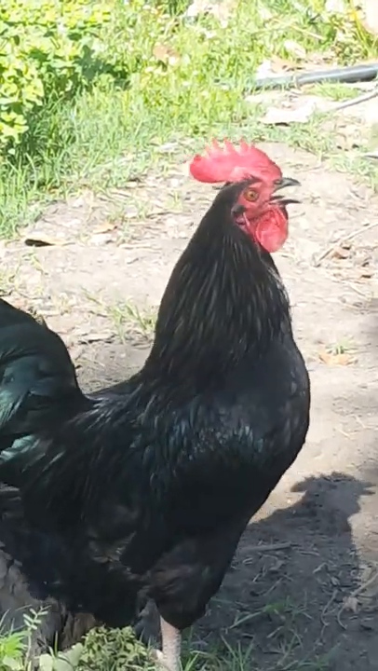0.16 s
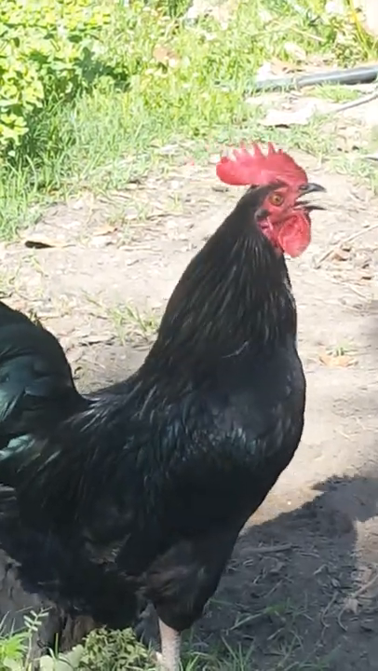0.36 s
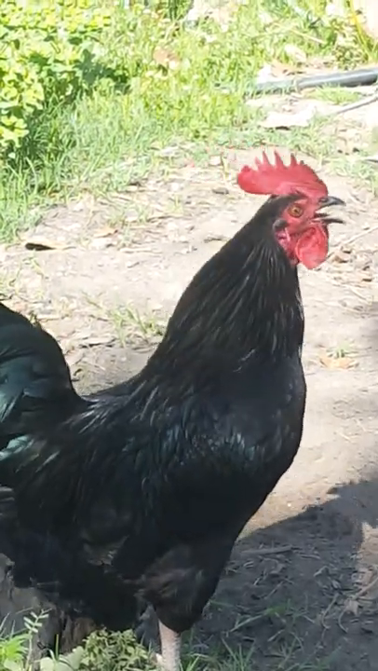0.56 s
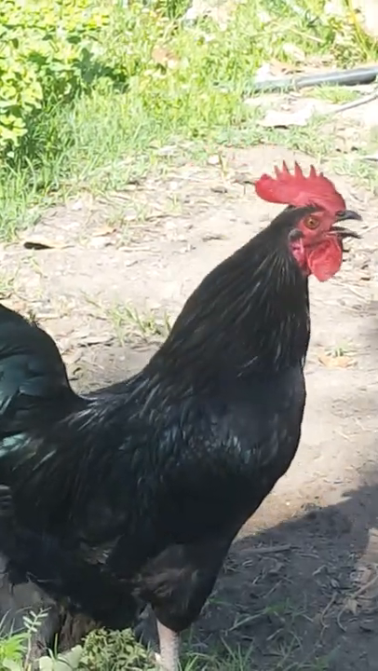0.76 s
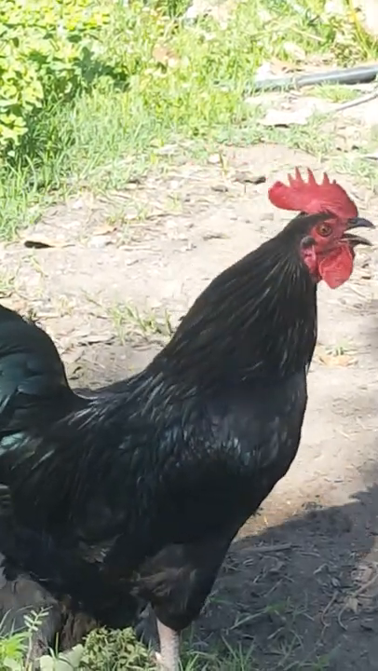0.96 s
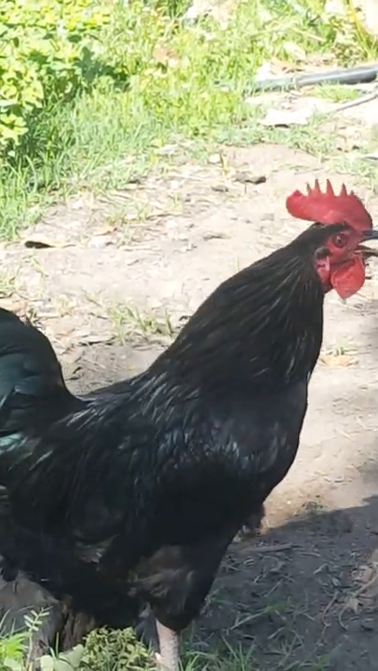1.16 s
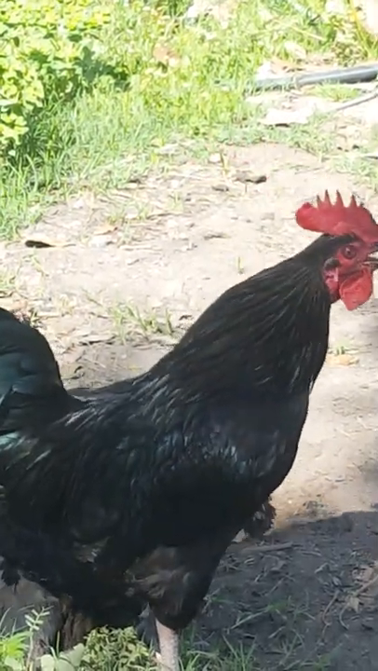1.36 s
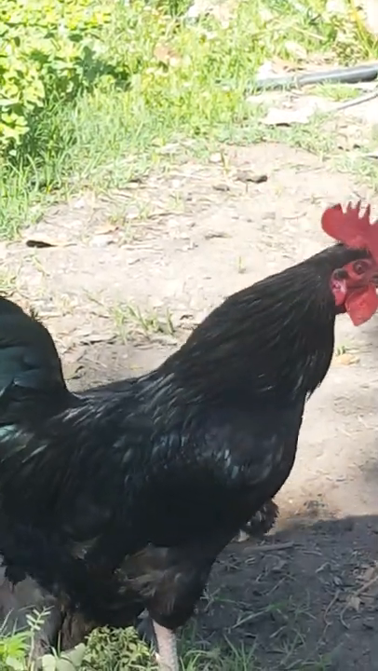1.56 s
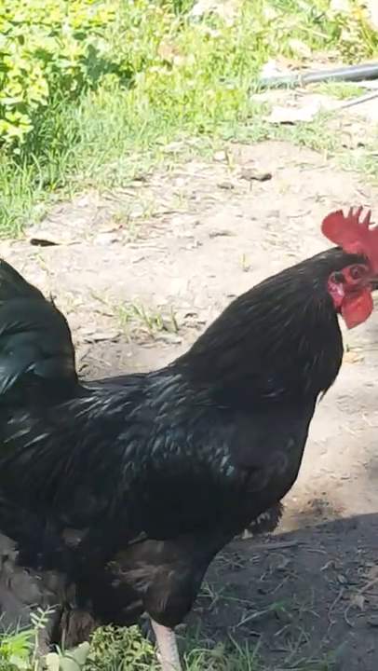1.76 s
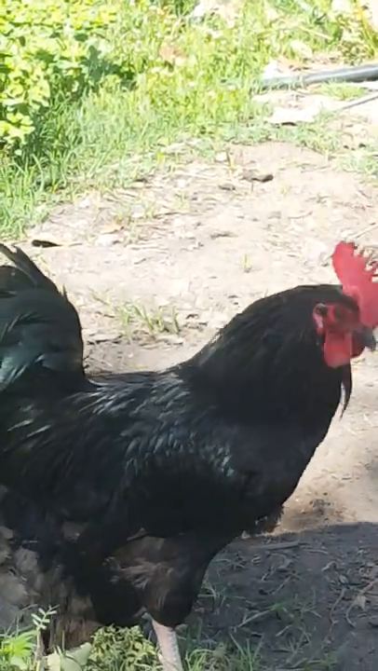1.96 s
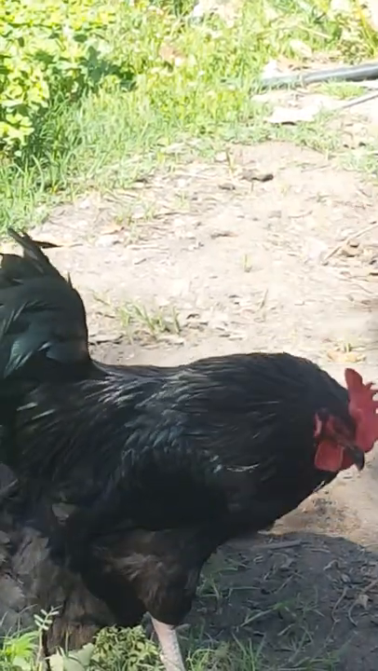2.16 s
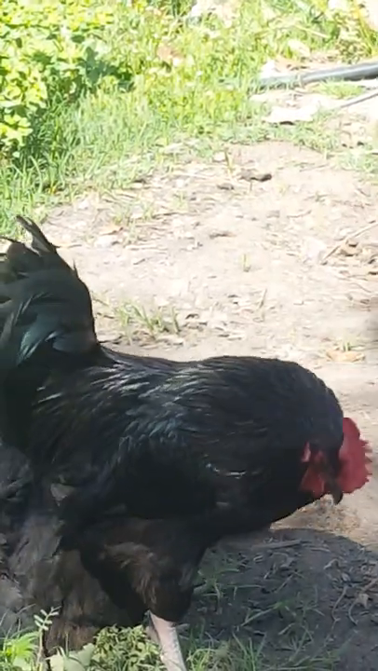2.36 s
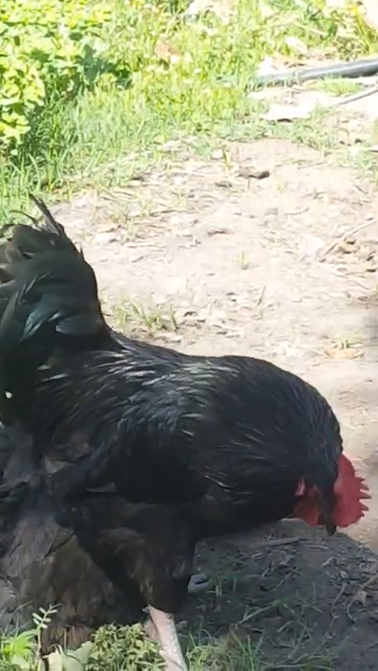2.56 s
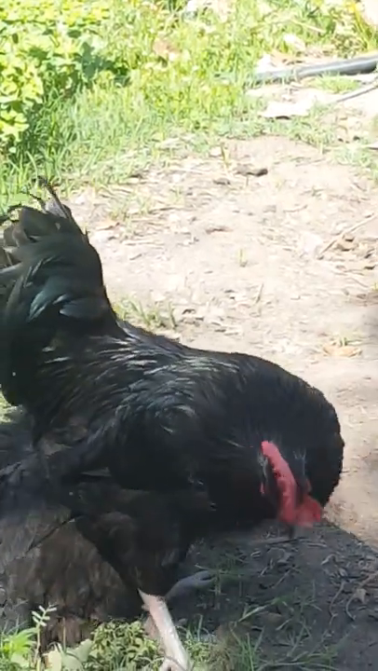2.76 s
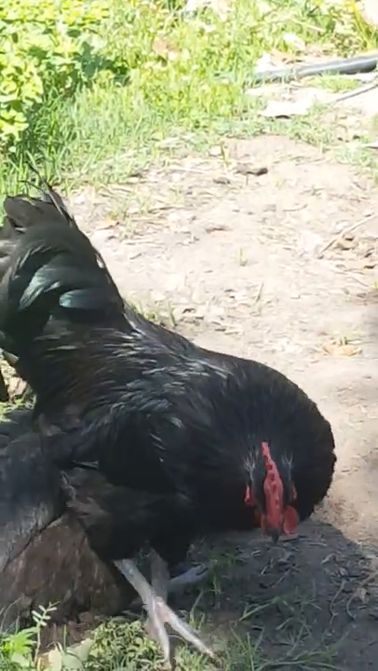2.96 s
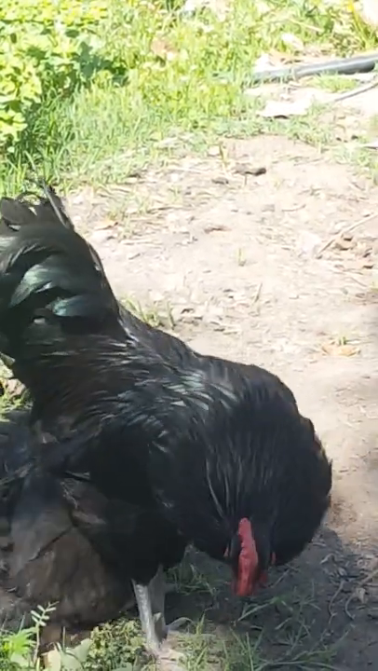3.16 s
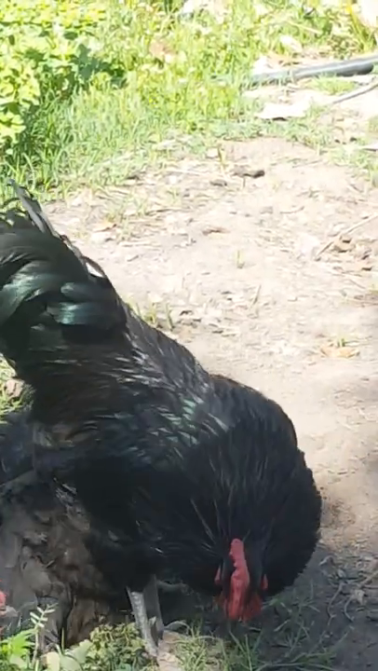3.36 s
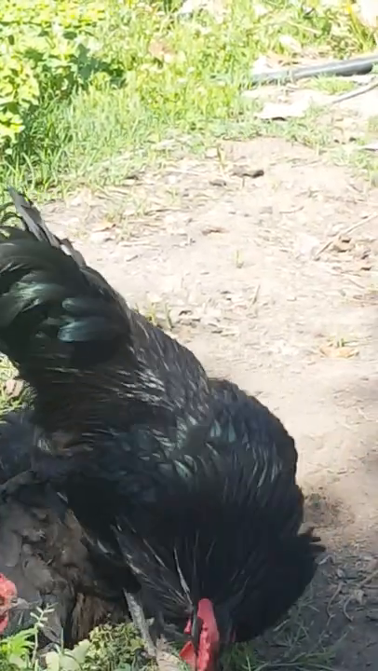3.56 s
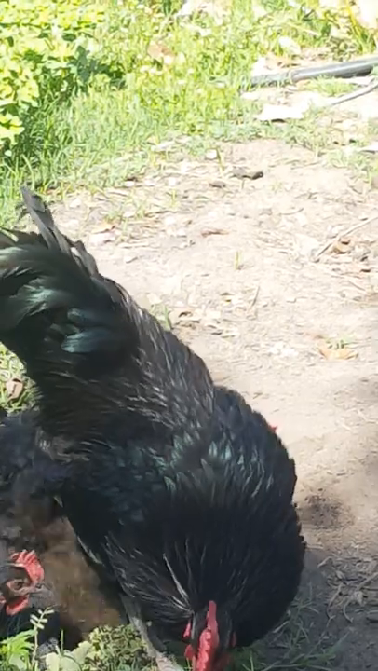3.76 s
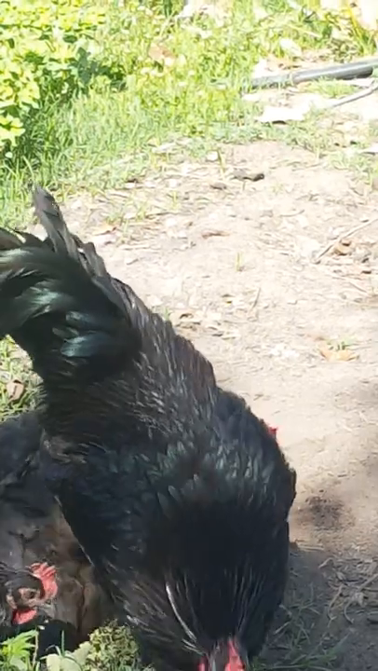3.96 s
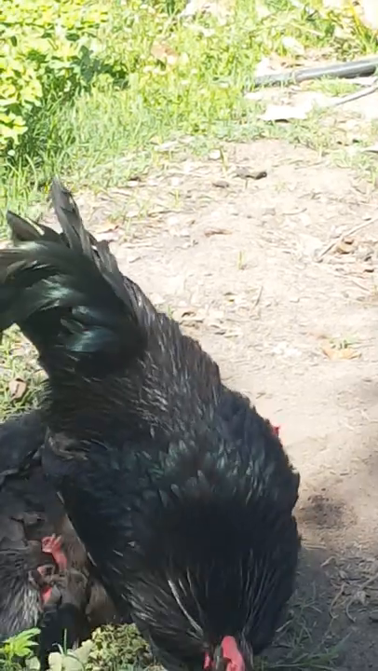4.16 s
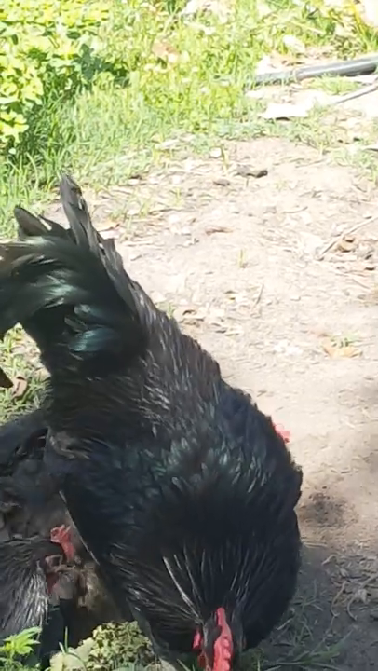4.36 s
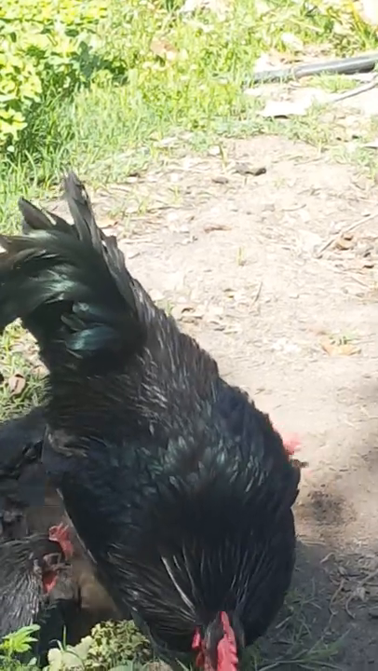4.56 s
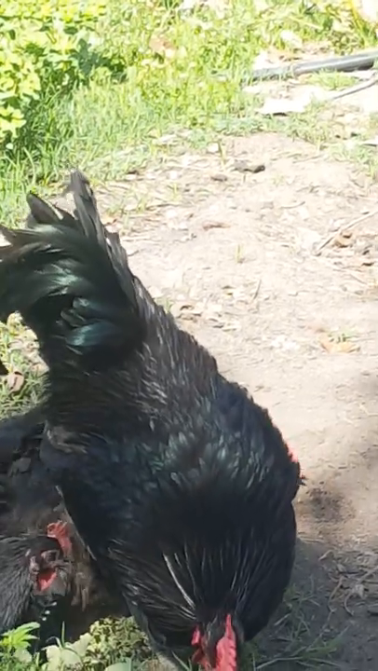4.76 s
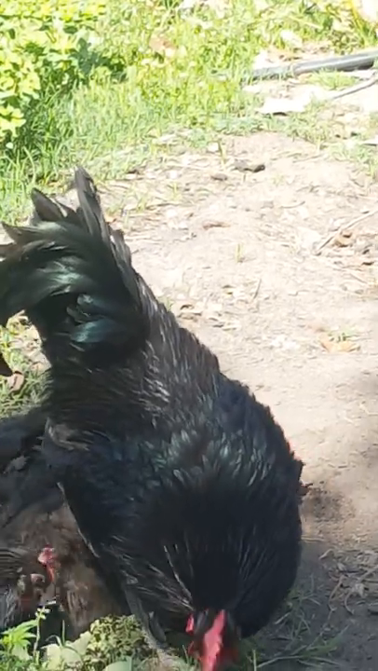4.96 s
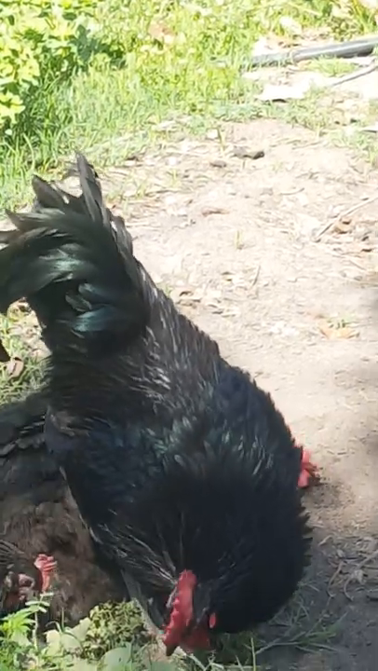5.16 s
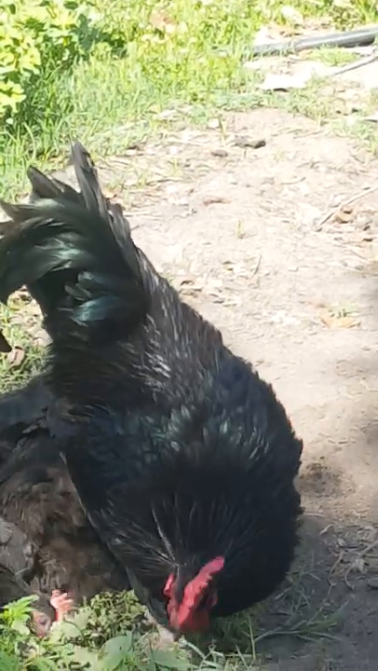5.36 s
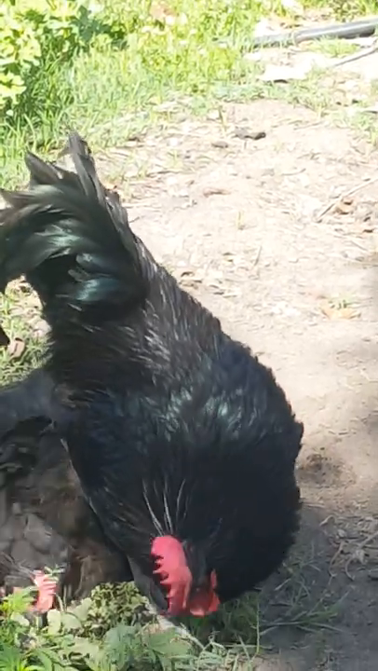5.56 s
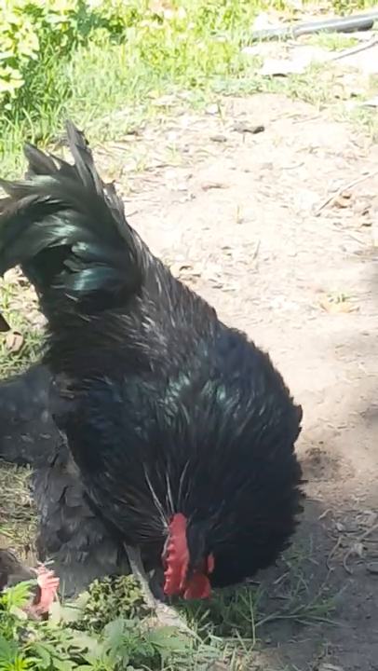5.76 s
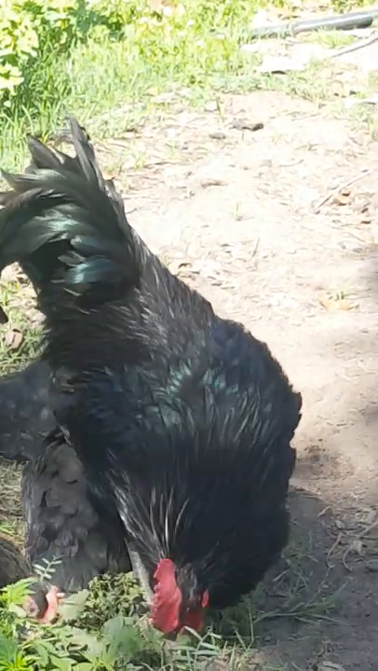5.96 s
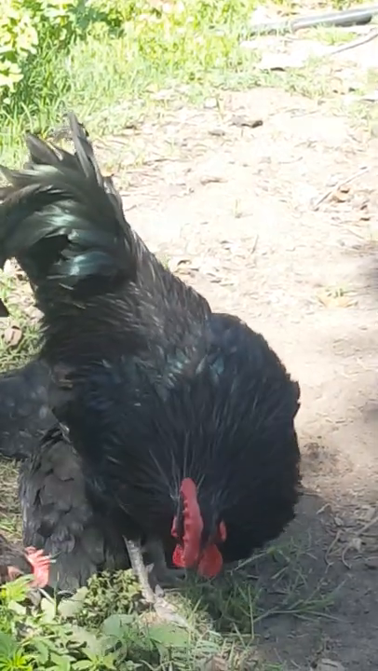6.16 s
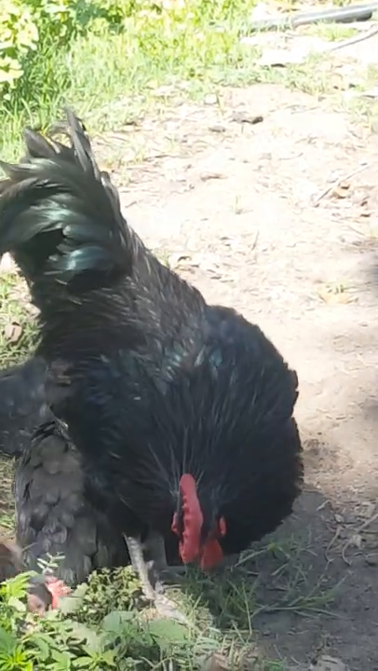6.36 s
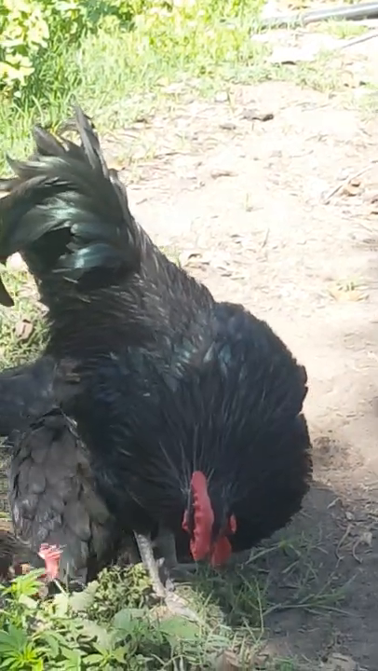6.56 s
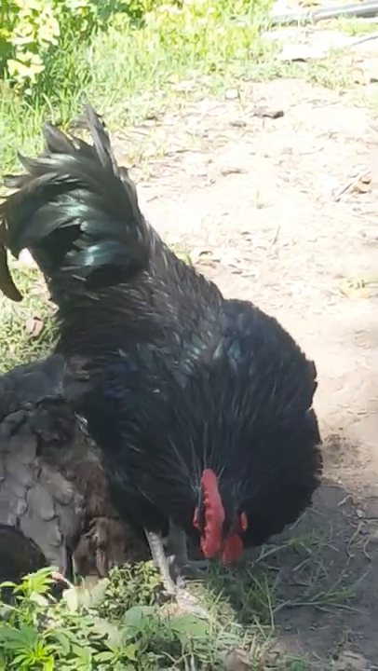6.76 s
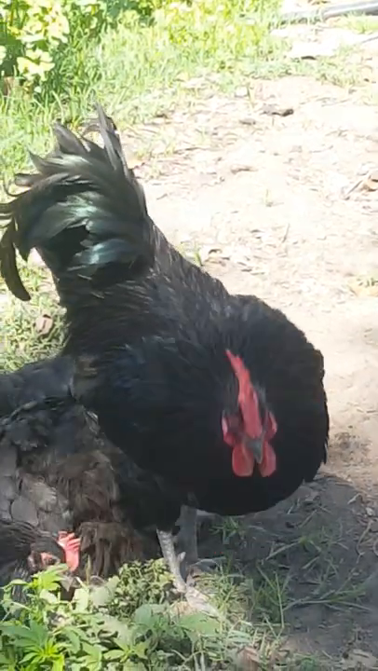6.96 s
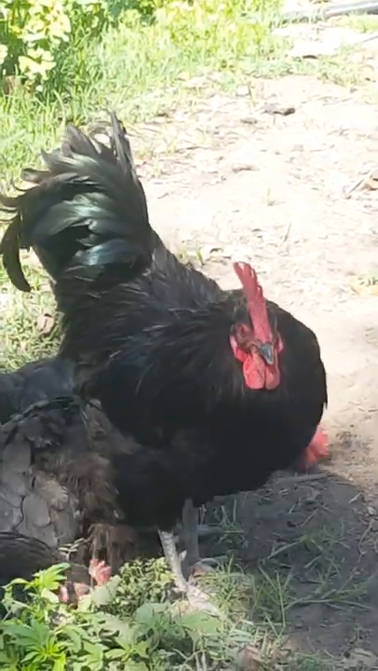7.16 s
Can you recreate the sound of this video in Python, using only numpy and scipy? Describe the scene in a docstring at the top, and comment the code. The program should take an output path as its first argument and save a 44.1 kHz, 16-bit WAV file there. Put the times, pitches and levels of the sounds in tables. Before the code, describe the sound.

A rooster close by finishes one loud, raspy crow with a long sinking note, then small birds chirp faintly over low outdoor rumble.

```python
"""A backyard: a rooster crows once, close by, with a cracked opening, a dip, then a long sinking note.
The crow is a stack of harmonics coloured by the throat, with a half-pitch undertone and pulsed noise for rasp.
Small birds farther off are near-pure notes on gliding pitches, blurred by the yard's scattered echo.
Short noise bursts tick on the ground; shaped noise makes the low outdoor rumble, under a wavering hum."""
import sys
import numpy as np
from scipy import signal
from scipy.fft import rfft, irfft
from scipy.io import wavfile
from scipy.ndimage import uniform_filter1d

SR = 44100
rng = np.random.default_rng(int(sys.argv[2]) if len(sys.argv) > 2 else 0)


def store_wav(level_fs):
    """Save 16-bit WAV to argv[1]."""
    pcm = np.round(np.clip(np.atleast_2d(level_fs), -1, 1) * 32767)
    wavfile.write(sys.argv[1], SR, pcm.T.astype(np.int16))


N = 321930  # length in samples

# The syrinx's pitch. Each row: time in seconds, pitch in Hz before the final drop.
CROW_PITCH = [(0.0, 827.4), (0.05, 816.4), (0.072, 690.6), (0.09, 662.4), (0.12, 692), (0.142, 594),
              (0.214, 540.5), (0.24, 554.7), (0.28, 623.4), (0.306, 648.6), (0.354, 664), (0.414, 658.3),
              (0.508, 679.2), (0.764, 672.9), (0.802, 655), (1.014, 644.4), (1.302, 610), (1.55, 539)]
# How the crow is pushed and shaped. Each row: time in seconds, effort in dB, overtones in dB, gape from 0 to 1.
CROW_SHAPE = [(0.0, 2.4, 1.9, 0.86), (0.05, 1.7, -2.2, 0.83), (0.07, -1, 1.5, 0.17), (0.13, -2, 3.0, 0.32),
              (0.17, 0.7, 4, 0.29), (0.21, -8.5, 7, 0.4), (0.26, 0.2, 4.5, 0.57), (0.33, 1.5, -3, 0.0),
              (0.48, 1.9, -3, 0.04), (0.51, 1.8, -4.5, 0.0), (0.75, 1.25, -4, 0.3), (0.8, 1.17, -1.4, 0.58),
              (1.3, 2.5, -1.6, 1.0), (1.5, -1, -0.3, 0.99), (1.57, 1.9, -1.2, 0.63)]
# Resonances of windpipe and beak; the harmonics slide through them.
# Each row: centre in Hz, width in Hz, gain in dB at gape 0, gain in dB at gape 1.
TRACT_RESONANCES = [(685.4, 84, -10.5, -6), (769.0, 114, -19, -10.0), (1241, 260, -13.0, -24.5),
                    (1586, 163, -36, -6.5), (2050, 300, -36.5, -18.5), (2287, 152, -22.5, -18.5),
                    (2563, 229.0, -30, -23.0), (3487, 1100, -30.5, -37)]
# Colour of the higher harmonics. Each row: frequency in Hz, relative level in dB.
TREBLE_COLOUR = [(3300, 3), (4000, -1), (4700, -4), (5500, -5.5), (6100, -1), (6700, 5.5), (7300, -7.5),
                 (7900, -3), (8600, -3.5), (9300, -24), (9900, -14.5), (10400, -21), (11200, -9),
                 (12300, -18.5), (13300, -5.5), (15500, -19.5)]
# Level of the higher harmonics together. Each row: time in seconds, level in dB before the trim.
TREBLE_LEVEL = [(0.0, -35), (0.098, -45.5), (0.258, -37), (0.366, -52.5), (1.294, -40), (1.532, -44.5),
                (1.55, -40.5)]
TREBLE_TRIM_DB = 1.5
# The open beak lets the top of the spectrum out. Each row: time in seconds, tilt of the top in dB.
BEAK_TOP = [(0, -14.5), (.12, -6.5), (.25, -10), (.4, 2), (.52, 3), (1.0, 6.5), (1.3, 11.5), (1.6, 5)]
# Hoarseness. Each row: time in seconds, rasp in dB before the rasp trim.
HOARSENESS = [(.024, -40), (.035, -23.5), (.056, -20.5), (.11, -34), (.14, -28), (.21, -49), (.275, -34.5),
              (.33, -53.5), (.48, -63), (.503, -40), (.8, -57.5), (1.04, -51.5), (1.065, -35), (1.16, -60),
              (1.53, -49), (1.585, -32.5)]
# The throat's colour on rasp and undertone. Each row: frequency in Hz, relative level in dB.
THROAT_COLOUR = [(300, -40), (520, -15), (750, -4), (950, -11), (1300, -3), (1700, 0), (2000, -3),
                 (2400, -2), (3000, -11), (3400, -10), (4300, -19), (5500, -22), (7000, -17), (8700, -23),
                 (9800, -40), (15000, -42)]
# Ground and wall reflections favour one ear, then the other.
# Each row: frequency in Hz, left over right in dB, left lead in radians.
EAR_BALANCE = [(550, 2.3, -.3), (680, 1.7, -.32), (820, -2, -.1), (1100, 0, .4), (1240, 9, .6),
               (1340, -.5, -.8), (1650, -6, -.2), (1780, -3, 1), (1880, 6, .2), (2020, 0, 0),
               (2300, -11, -1.5), (2450, 6, 0), (2570, -7, .6), (2720, -2, 1.4), (3070, 9, 1.2),
               (3200, -4, .2), (3320, 10, 1.3), (3900, -6, -1), (4500, 3, 0), (6700, 1, 1.6),
               (8200, 1, 1.6), (13000, -3, 2.5)]
# The crow is already under way at time 0; the echo level is how much of it the yard throws back.
CROW_START_S, CROW_ECHO_DB = -.15, -14.5
# The air runs out: pitch and level drop, then the syrinx shuts.
LET_GO_S, SHUT_S, DROP_HZ_PER_S, DROP_DB_PER_S = 1.556, 1.608, 1900, 280
# Pitch jitter of the clean voice, and more per unit of rasp amplitude, as shares of the pitch.
JITTER_CLEAN, JITTER_RASP = 0.0015, .08
SHIMMER = 1.3  # unevenness of loudness from cycle to cycle, per unit of rasp amplitude
# The undertone grows with rasp (dB per dB) and as the bird tires; it comes and goes.
UNDER_DB, UNDER_FOLLOW, TIRING_DB_PER_S, UNDER_PATCHY_DB = -33, 0.44, 7.5, 2
# Late in the long note the voice nearly breaks to the half pitch.
BREAK_S, BREAK_WIDTH_S, BREAK_DB = 1.39, 0.054, 11

# All bird levels are before distance, ear balance and echo.
# Full chirps sweep up to a top, then hook down.
# Each row: start in seconds, length in seconds, top in Hz, level in dB.
FULL_CHIRPS = [(1.86, 0.089, 4940, -55.5), (2.104, 0.049, 5230, -55), (2.159, 0.052, 6020, -44),
               (2.32, 0.074, 4580, -42), (3.152, 0.076, 4770, -42.5), (3.326, 0.07, 4806, -40.5),
               (3.977, 0.068, 5500, -51), (4.805, 0.065, 5320, -51.5), (4.98, .06, 4620, -42),
               (5.781, 0.073, 5590, -40), (5.975, 0.056, 4810, -39), (6.48, 0.043, 5770, -46),
               (6.529, 0.045, 5730, -47.5)]
# Share of the length spent rising; start and end pitch as shares of the top.
CHIRP_RISE, CHIRP_FROM, CHIRP_TO = .56, .56, .7
# Short chips slide down. Each row: start in seconds, top in Hz, level in dB.
SHORT_CHIPS = [(2.021, 6800, -56.5), (2.235, 5900, -49.5), (2.51, 4450, -55.5), (2.725, 7100, -58.5),
               (2.8, 6270, -55.5), (2.88, 5200, -58), (3.01, 3830, -54.5), (3.101, 5730, -53.5),
               (3.279, 5800, -48.5), (3.655, 4630, -52.5), (3.72, 3530, -50.5), (3.815, 6560, -50.5),
               (3.845, 4030, -52), (4.07, 3860, -50.5), (4.28, 4830, -51), (4.335, 3780, -56),
               (4.49, 6750, -55.5), (4.71, 4390, -50.5), (4.885, 6770, -57), (4.89, 4170, -51.5),
               (5.68, 4940, -50.5), (5.72, 7100, -51), (5.725, 3690, -46.5), (5.84, 4700, -45),
               (6.459, 4840, -50.5)]
CHIP_S, CHIP_FALL = .04, .25  # length; fall as a share of the top
# Faint chips from the rest of the flock: pitch and level are centres of a random spread.
FLOCK_FROM_S, FLOCK_TO_S, FLOCK_PER_S, FLOCK_HZ, FLOCK_DB = 1.6, 4.6, 5, 4670, -56.5
# The other side of a small bird's syrinx sings along: share of the pitch, relative level.
SECOND_VOICE, SECOND_VOICE_DB = .84, -6
# Thin reedy whistles. Each row: start in seconds, length in seconds, start pitch in Hz, end pitch in Hz, level in dB.
REEDY_WHISTLES = [(3.135, 0.15, 2571, 2545, -43), (3.266, 0.049, 1956, 1976, -52),
                  (3.548, .12, 2454, 2522, -50.5), (3.845, 0.075, 2605, 2425, -51),
                  (3.991, .11, 2460, 2620, -45), (4.083, 0.057, 2110, 2080, -48)]
# One pure falling slur: start in seconds, length in seconds, start pitch in Hz, end pitch in Hz, level in dB.
FALLING_SLUR = (2.663, .135, 2920, 1900, -49)
# One soft low note, likely a hen: start in seconds, length in seconds, pitch in Hz, level in dB.
HEN_NOTE = (2.095, .1, 628, -49.5)

# Dry ticks of feet and beaks on the ground. Each row: start in seconds, level in dB before the decay.
GROUND_TICKS = [(2.558, -53), (3.448, -52), (4.479, -49)]

# Outdoor air's spectrum. Each row: frequency in Hz, relative level per hertz in dB.
AIR_COLOUR = [(12, -34.5), (25, -19), (45, -6), (80, -0.5), (150, -4.5), (220, -10.5), (300, -12),
              (450, -16), (700, -16.5), (1000, -21.5), (1600, -22.5), (4000, -32.5), (7000, -40),
              (10000, -55), (15400, -55)]
# Left-right likeness of the air. Each row: frequency in Hz, likeness from 0 to 1.
AIR_LIKENESS = [(60, 1), (130, 1), (290, 0.98), (640, 0.9), (1410, 0.2), (3100, 0), (15000, 0.7)]
# Air from the left reaches that ear first. Each row: frequency in Hz, left lead in radians.
AIR_LEAD = [(20, 0), (780, 0.47), (1400, 1), (2400, 4.5), (4100, 10.5), (6800, 11)]
AIR_DB, HUM_HZ, HUM_DB = -44, 155.7, -54  # overall air level; centre pitch and level of the hum
# The air swells once and settles, mostly in its middle (murmur) and a little in the bass (rumble).
SWELL_S, SWELL_WIDTH_S, MURMUR_DB, RUMBLE_DB = 2.48, 0.95, 5, 1

# The yard's echo. Each row: frequency in Hz, time to die by 60 dB in seconds.
YARD_DECAY = [(300, 1), (800, 0.87), (1700, 0.46), (3000, 0.48), (4500, 0.5), (8000, 0.54), (15000, 0.13)]
HISS_DB, CUT_HZ = -76, 15700  # the microphones' own hiss; the recorder's band limit


def rooster(rasp_trim_db=-1, gulp_s=1.586, gulp_hz=750, gulp_db=-22):
    """The syrinx buzzes on one pitch; strain adds jitter, a half-pitch undertone and pulsed rasp."""
    t = np.arange(CROW_START_S, SHUT_S, 1 / SR)
    size = len(t)
    rasp_db = over_time(HOARSENESS, t)[0]
    jitter = JITTER_CLEAN + JITTER_RASP * amp(rasp_db)
    spent = np.maximum(t - LET_GO_S, 0)
    hz = over_time(CROW_PITCH, t)[0] - DROP_HZ_PER_S * spent
    phase = 2 * np.pi * np.cumsum(hz * (1 + jitter * wander(size, 160))) / SR
    shimmer = 1 + SHIMMER * amp(rasp_db) * wander(size, 110)
    ears = harmonics(t, hz, phase, jitter) * shimmer
    ears += undertone(t, hz, phase, rasp_db)
    ears += rasp(t, phase) * amp(rasp_db + rasp_trim_db)
    ears *= amp(-DROP_DB_PER_S * spent)
    # the windpipe rings briefly as the syrinx shuts
    gulp = np.exp(-((t - gulp_s) / 0.0067) ** 2) * np.sin(2 * np.pi * gulp_hz * t)
    ears += amp(gulp_db) * gulp
    ears *= np.clip((t[-1] - t) / 0.0084, 0, 1)
    early = round(-CROW_START_S * SR)
    ears = np.pad(ears, ((0, 0), (0, N + early - size)))
    # soft ground and plants give back little of the lowest harmonic
    thrown = signal.sosfilt(signal.butter(3, 800, "high", fs=SR, output="sos"), ears.mean(0))
    return (ears + amp(CROW_ECHO_DB) * yard(thrown))[:, early:]


def harmonics(t, hz, phase, jitter, count=28, flutter_db=.7, drift_db=.6, ripple_db=3, spread=.9):
    """The clear part of the crow at both ears; the throat delays each harmonic by its own amount."""
    effort_db, overtones_db, gape = over_time(CROW_SHAPE, t)
    low = [tract(k * hz, np.clip(gape, 0, 1)) * amp(effort_db + overtones_db * (k > 1))
           for k in range(1, 6)]
    # the high harmonics share one level and slide through the throat's peaks and fine ripples
    high_hz = np.arange(len(low) + 1, count + 1)[:, None] * hz
    grid = np.arange(0, SR / 2, 170)
    ripples = ripple_db * np.interp(high_hz, grid, rng.standard_normal(len(grid)))
    top = over_time(BEAK_TOP, t)[0] * np.clip((high_hz - 6000) / 800, 0, 1)
    high = amp(over_hz(TREBLE_COLOUR, high_hz) + ripples + top)
    high *= amp(over_time(TREBLE_LEVEL, t)[0] + TREBLE_TRIM_DB) / np.sqrt((high ** 2).sum(0))
    fray = np.minimum(38 * jitter, .3)
    ears = np.zeros((2, len(t)))
    side = np.array([[.5], [-.5]])  # left, right
    for k, gain in enumerate([*low, *high], 1):
        # higher harmonics flutter more, and fray when the voice is strained
        flutter = amp(flutter_db * np.log(k) * wander(len(t), 45))
        flutter *= 1 + fray * np.log(k) * wander(len(t), 110)
        flutter *= amp(drift_db * np.log(k) * wander(len(t), 9.8))  # and each swells and fades slowly
        pan = amp(side * over_hz(EAR_BALANCE, k * hz))
        pan /= np.sqrt((pan ** 2).mean(0))
        lead = side * over_hz(EAR_BALANCE, k * hz, order=2)
        ears += np.sqrt(2) * gain * flutter * pan * np.cos(k * phase + spread * k ** 2 + lead)
    return ears


def tract(hz, gape):
    """Gain of windpipe and beak resonances at these frequencies, each shifting in level with the gape."""
    power = 0
    for centre, width, narrow_db, wide_db in TRACT_RESONANCES:
        peak = amp(narrow_db + (wide_db - narrow_db) * gape)
        power = power + (peak / (1 + (2 * (hz - centre) / width) ** 2)) ** 2
    return np.sqrt(power)


def undertone(t, hz, phase, rasp_db):
    """Alternate strong and weak cycles put lines halfway between the harmonics."""
    size = len(t)
    lines = np.zeros(size)
    for k in np.arange(1, 14) + .5:
        gain = amp(over_hz(THROAT_COLOUR, k * hz) + 3 * wander(size, 18))
        lines += gain * np.cos(k * phase + k ** 2)
    level_db = UNDER_DB + UNDER_FOLLOW * rasp_db + TIRING_DB_PER_S * t
    level_db += UNDER_PATCHY_DB * wander(size, 12)
    level_db += BREAK_DB * np.exp(-((t - BREAK_S) / BREAK_WIDTH_S) ** 2)
    return unit(lines) * amp(level_db)


def rasp(t, phase):
    """Air tears through the syrinx once a cycle: pulsed noise, partly shared by the ears."""
    size = len(t)
    noise = rng.standard_normal(size) + 0.46 * rng.standard_normal((2, size))
    puffs = noise * (1 + 0.51 * np.cos(phase))
    colour = amp(over_hz(THROAT_COLOUR, np.fft.rfftfreq(size, 1 / SR)))
    torn = irfft(rfft(puffs) * colour, size)
    top = signal.sosfiltfilt(signal.butter(4, 6500, "high", fs=SR, output="sos"), torn)
    return unit(torn + (amp(over_time(BEAK_TOP, t)[0]) - 1) * top)


def birds(direct_db=-5, wall_db=-9, wall_s=0.02, echo_db=-3, right_db=2):
    """Small birds and a low note some way off: direct sound, a slap from a wall, and scattered echo."""
    song = np.zeros(N)
    for s, length, top_hz, db in FULL_CHIRPS:
        add(song, s, amp(db) * chirp(length, top_hz))
    for s, top_hz, db in SHORT_CHIPS:
        add(song, s, amp(db) * chip(top_hz))
    flock_s = FLOCK_TO_S - FLOCK_FROM_S
    for when, pitch, strength in rng.random((round(FLOCK_PER_S * flock_s), 3)):
        faint = amp(FLOCK_DB) * (.5 + strength) * chip(FLOCK_HZ * 2 ** (pitch - .5))
        add(song, FLOCK_FROM_S + when * flock_s, faint)
    for s, length, start_hz, end_hz, db in REEDY_WHISTLES:
        hz = start_hz + (end_hz - start_hz) * progress(length)
        whistle = note(hz, second_db=-15, third_db=-19.5, waver=0.0048, waver_hz=90.5, flicker_db=3)
        add(song, s, amp(db) * whistle)
    s, length, start_hz, end_hz, db = FALLING_SLUR
    hz = start_hz + (end_hz - start_hz) * progress(length) ** 1.5
    add(song, s, amp(db) * note(hz, second_db=-32, third_db=-40, waver=0.019, waver_hz=90, flicker_db=3))
    s, length, hz, db = HEN_NOTE
    steady = np.full(int(length * SR), hz)
    add(song, s, amp(db) * note(steady, second_db=-3, third_db=-18, waver=0.019, waver_hz=60.3, flicker_db=2))
    near = amp(direct_db) * song
    add(near, wall_s, amp(wall_db) * song)
    ears = np.array([near, np.roll(near, 11)])  # the right ear hears it 11 samples later
    return (ears + amp(echo_db) * yard(song)) * amp([[-right_db], [right_db]])


def chirp(length, top_hz, swell_db=7):
    """Sweeps up, growing louder toward the top, then hooks down."""
    u = progress(length)
    rising = np.maximum(1 - u / CHIRP_RISE, 0)
    falling = np.maximum((u - CHIRP_RISE) / (1 - CHIRP_RISE), 0)
    hz = top_hz * (1 - (1 - CHIRP_FROM) * rising ** 1.4 - (1 - CHIRP_TO) * falling ** 1.67)
    return unit(twitter(hz) * amp(-swell_db * rising))


def chip(top_hz):
    """A short slide downward."""
    return twitter(top_hz * (1 - CHIP_FALL * progress(CHIP_S) ** 1.4))


def twitter(hz):
    """Both sides of a small bird's syrinx warble along one pitch curve, the second lower and weaker."""
    upper, lower = (note(share * hz, second_db=-32, third_db=-54, waver=0.0171, waver_hz=169, flicker_db=6.0)
                    for share in (1, SECOND_VOICE))
    return unit(upper + amp(SECOND_VOICE_DB) * lower)


def note(hz, second_db, third_db, waver, waver_hz, flicker_db):
    """Three harmonics on a pitch curve, wavering fast in pitch and strength."""
    phase = 2 * np.pi * np.cumsum(hz * (1 + waver * wander(SR // 2, waver_hz)[:len(hz)])) / SR
    tone = np.sin(phase) + amp(second_db) * np.sin(2 * phase) + amp(third_db) * np.sin(3 * phase)
    tone *= amp(flicker_db * wander(SR // 2, 120)[:len(hz)])
    return unit(tone * signal.windows.tukey(len(hz), .45))


def progress(length):
    """Runs from 0 to 1 over a note's length in seconds."""
    return np.linspace(0, 1, max(int(length * SR), 64))


def ticks(centre_hz=3500, width_octaves=0.62, decay_s=0.0038, echo_db=-10):
    """Grit and dry stalks snap under the foraging fowl: band-shaped noise that dies in milliseconds."""
    t, out = np.arange(1024) / SR, np.zeros(N)
    hz = np.fft.rfftfreq(len(t), 1 / SR)
    colour = np.exp(-(np.log2((hz + 1) / centre_hz) / width_octaves) ** 2 / 2)
    for s, db in GROUND_TICKS:
        snap = unit(irfft(rfft(rng.standard_normal(len(t))) * colour))
        add(out, s, amp(db) * snap * np.exp(-t / decay_s))
    return out + amp(echo_db) * yard(out)


def air(patchy_db=2.0, swell_hz=450, left_db=0.55):
    """Low rumble and faint hiss, noise shaped in drifting patches, with a wavering distant hum."""
    frames, hz = N // 512 + 5, np.fft.rfftfreq(2048, 1 / SR)
    a, b, c, d, patches = rng.standard_normal((5, frames, len(hz))).transpose(0, 2, 1)
    patches = uniform_filter1d(patches, size=12, axis=0)
    patches = unit(uniform_filter1d(patches, size=10, axis=1))
    # the right ear shares part of the left ear's noise, a little later
    same = np.clip(over_hz(AIR_LIKENESS, hz), -1, 1)[:, None]
    left = a + 1j * b
    right = same * left + np.sqrt(1 - same ** 2) * (c + 1j * d)
    z = np.array([left, right * np.exp(-1j * over_hz(AIR_LEAD, hz))[:, None]])
    middle = np.exp(-np.log((hz + 1) / swell_hz) ** 2)[:, None]
    bass = 1 / (1 + (hz[:, None] / 170) ** 4)
    t = np.arange(frames) * 512 / SR
    swell = np.exp(-((t - SWELL_S) / SWELL_WIDTH_S) ** 2)
    swell_db = swell * (MURMUR_DB * middle + RUMBLE_DB * bass)
    z *= amp(over_hz(AIR_COLOUR, hz)[:, None] + patchy_db * patches + swell_db)
    wash = unit(signal.istft(z, nperseg=2048, noverlap=1536)[1][:, :N])
    hum_phase = 2 * np.pi * np.cumsum(HUM_HZ + 4 * wander(N, 6.1)) / SR
    hum = unit((1 + .6 * wander(N, 1.7)) * np.sin(hum_phase))
    return (amp(AIR_DB) * wash + amp(HUM_DB) * hum) * amp([[left_db], [-left_db]])


def yard(x, gap=0.0063):
    """Scattered echoes from walls and plants, different at each ear, each band dying at its own speed."""
    taps = rng.choice([-1., 1.], (2, SR)) * (rng.random((2, SR)) < 2500 / SR)  # about 2500 a second
    taps *= np.clip(np.arange(SR) / SR / gap - .5, 0, 1)  # silent for half the gap, then fading in
    hz, t, z = signal.stft(taps, SR, nperseg=256)
    t60 = over_hz(YARD_DECAY, hz)[:, None]
    tail = signal.istft(z * amp(-60 * t / t60), SR, nperseg=256)[1]
    return signal.fftconvolve(x[None], tail / np.linalg.norm(tail[0]), axes=1)[:, :len(x)]


def amp(db):
    """Decibels to gain."""
    return 10 ** (np.asarray(db) / 20)


def unit(x):
    """Scales to rms 1."""
    return x / np.sqrt(np.mean(x ** 2) + 1e-20)


def over_time(rows, t):
    """Each column of a curve table at the times t."""
    s, *columns = np.transpose(rows)
    return [np.interp(t, s, c) for c in columns]


def over_hz(rows, hz, order=1):
    """One column of a spectrum table on a log-frequency axis."""
    table = np.transpose(rows)
    return np.interp(np.log(hz + 1), np.log(table[0] + 1), table[order])


def wander(size, rate_hz):
    """Random motion of rms 1, mostly slower than the rate."""
    hz = np.fft.rfftfreq(size, 1 / SR)
    return unit(irfft(rfft(rng.standard_normal(size)) / (1 + (hz / rate_hz) ** 4), size))


def add(mix, s, sound):
    """Mixes a sound in at time s."""
    part = mix[max(round(s * SR), 0):][:len(sound)]
    part += sound[:len(part)]


def scene():
    """The rooster in front, birds, ticks and air behind."""
    return rooster() + birds() + ticks() + air()


def record(dry):
    """The microphones' own faint hiss, then the recorder's band limit."""
    heard = dry + amp(HISS_DB) * rng.standard_normal(dry.shape)
    band_limit = signal.firwin(511, CUT_HZ, window=("kaiser", 9), fs=SR)
    return signal.oaconvolve(heard, band_limit[None], "same")


dry = scene()
out = record(dry)
store_wav(out)
```